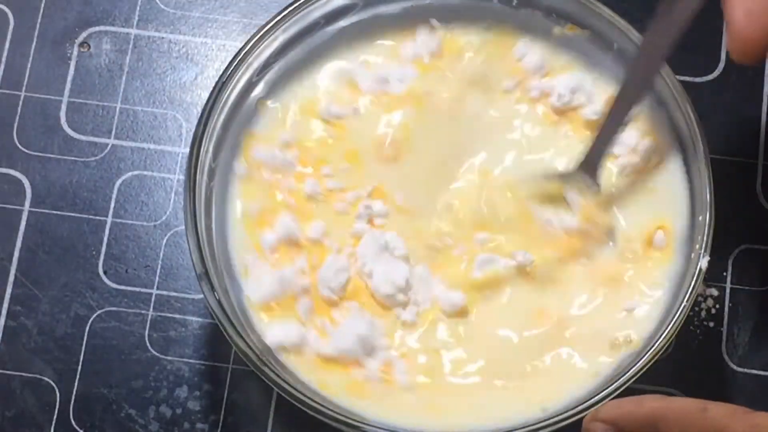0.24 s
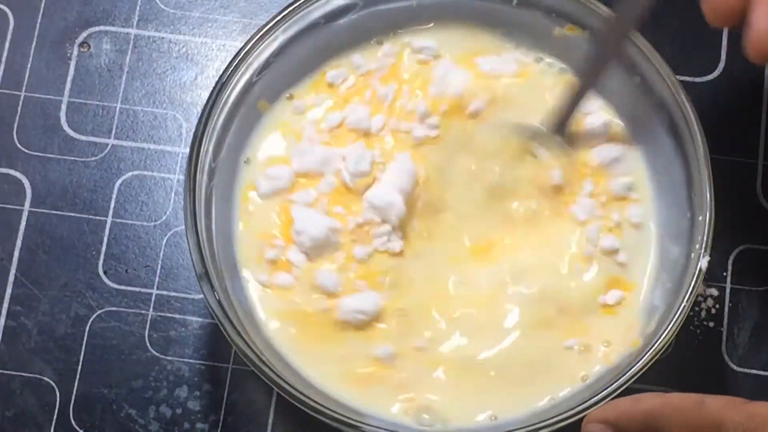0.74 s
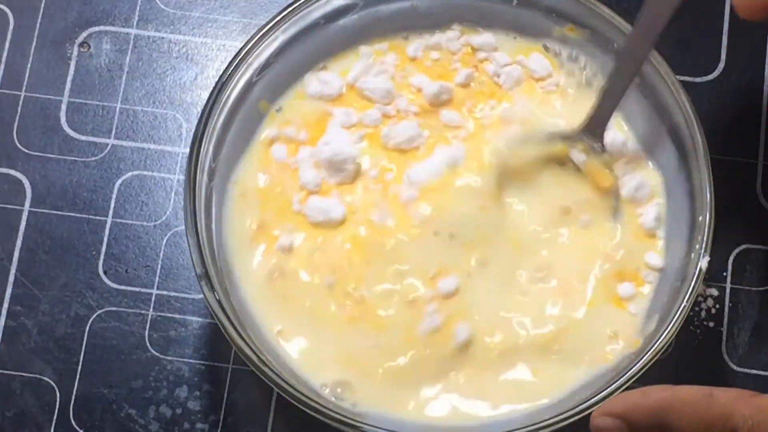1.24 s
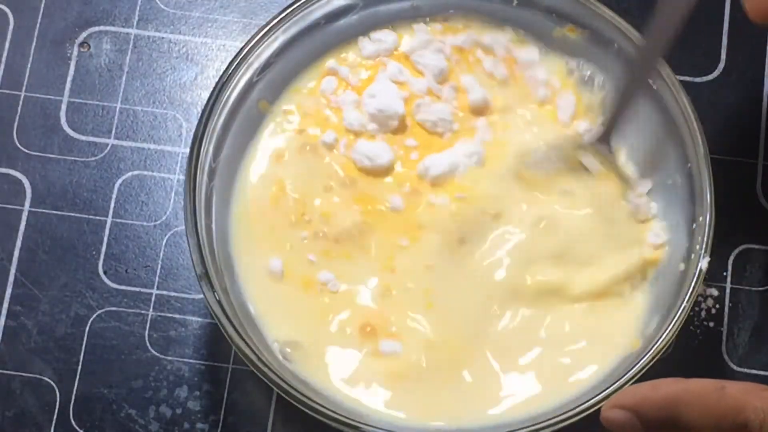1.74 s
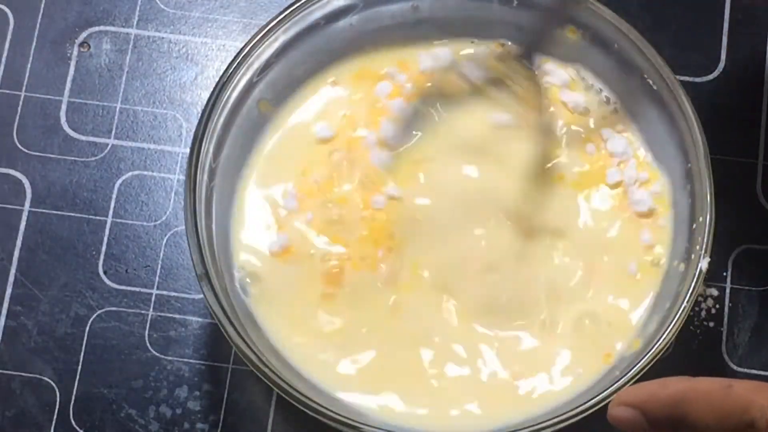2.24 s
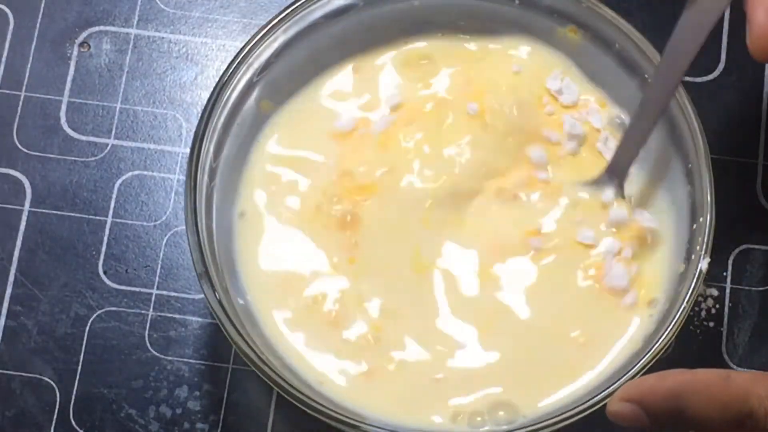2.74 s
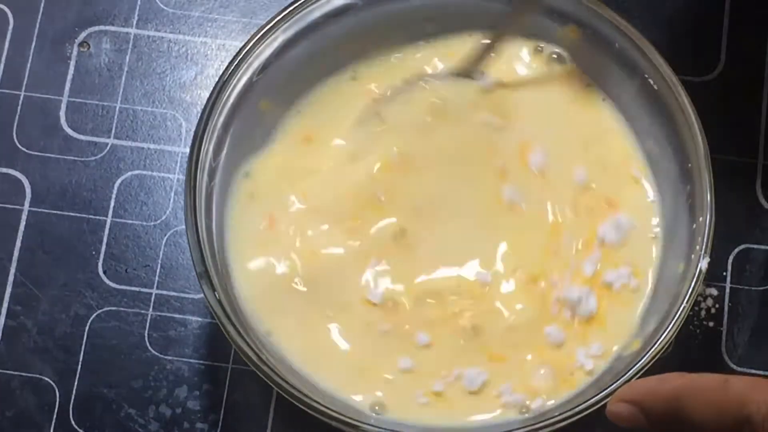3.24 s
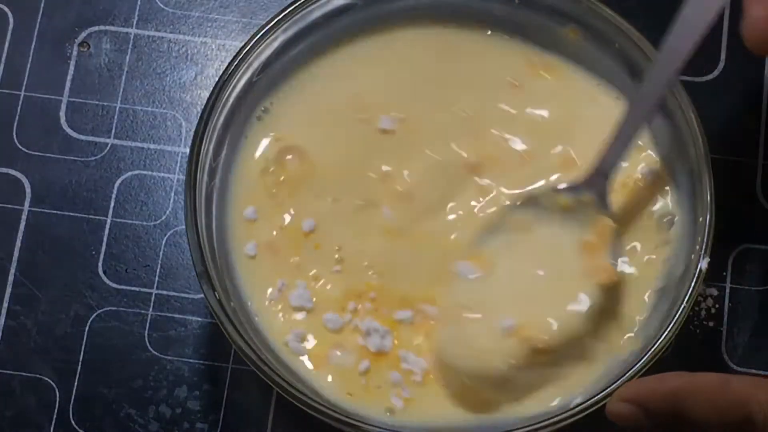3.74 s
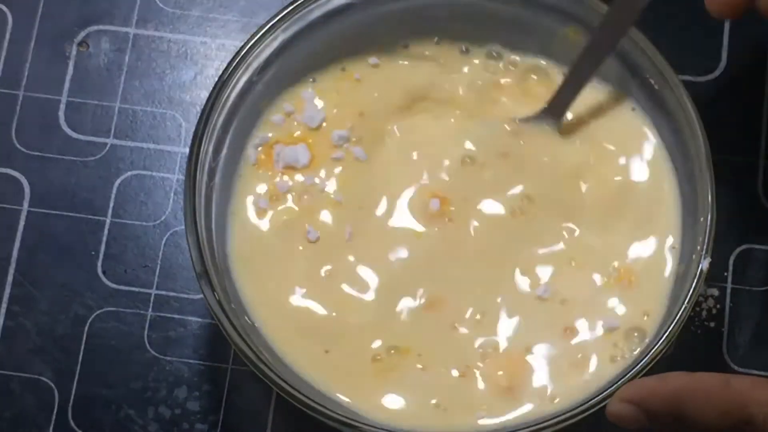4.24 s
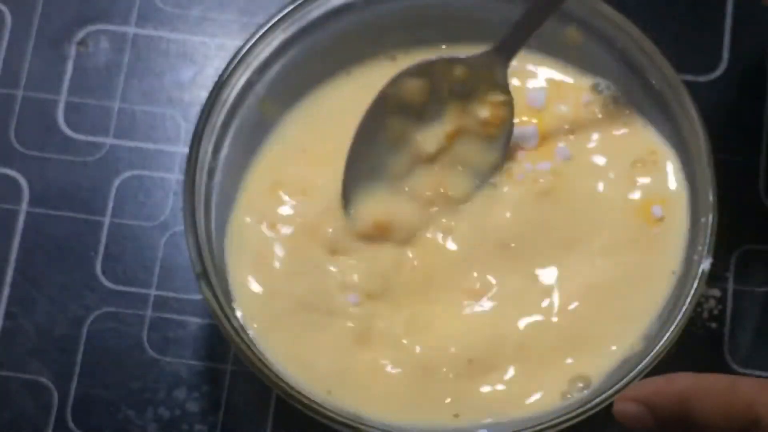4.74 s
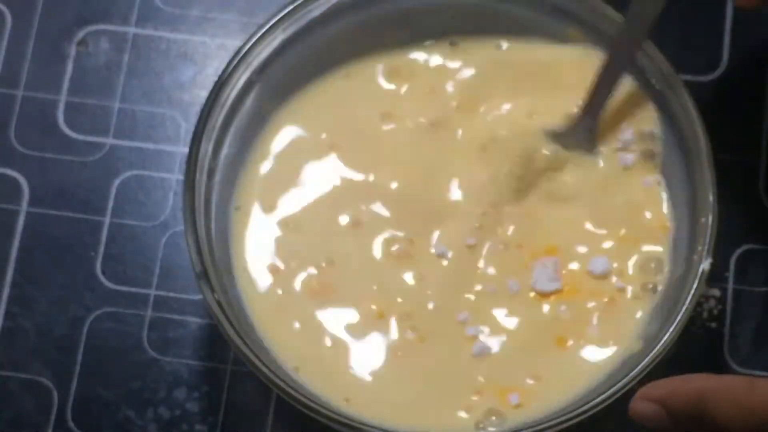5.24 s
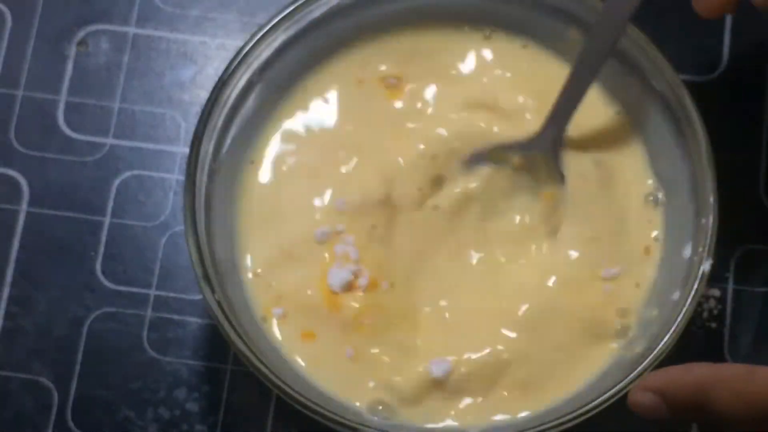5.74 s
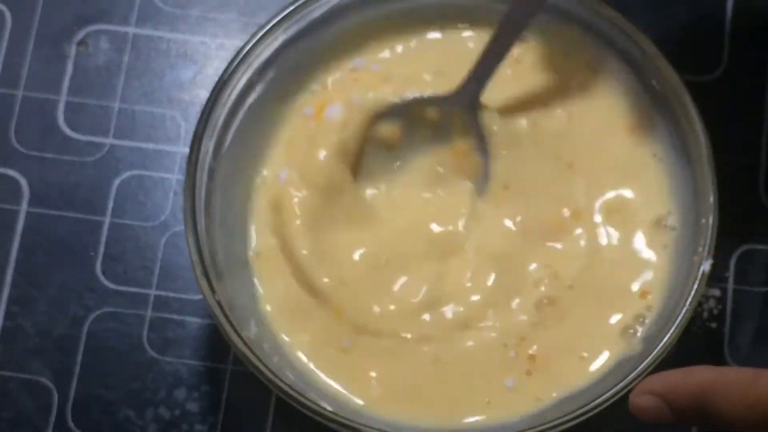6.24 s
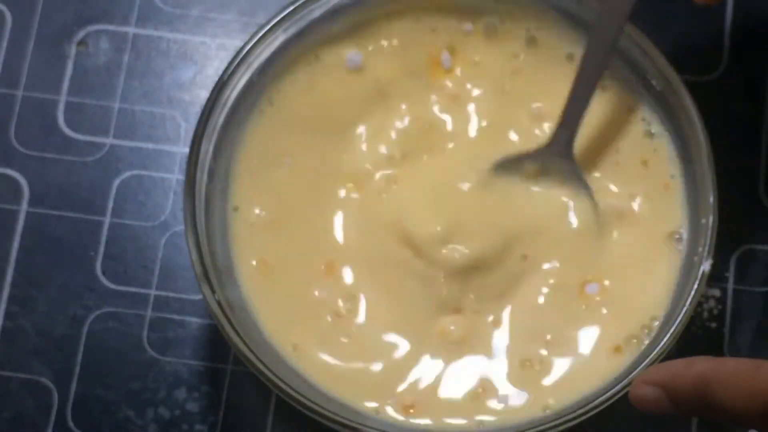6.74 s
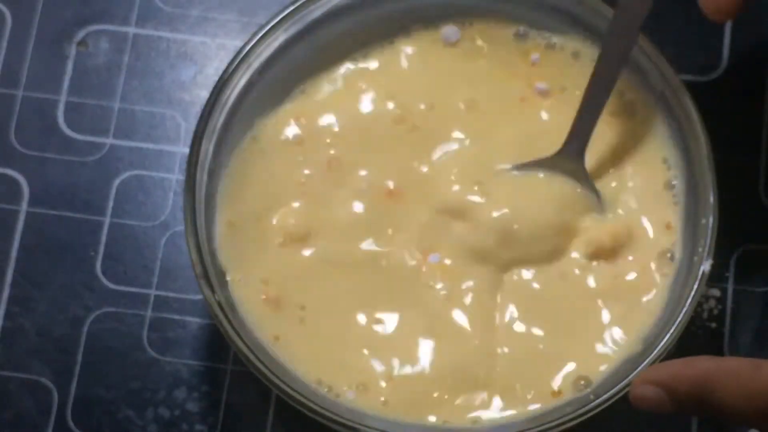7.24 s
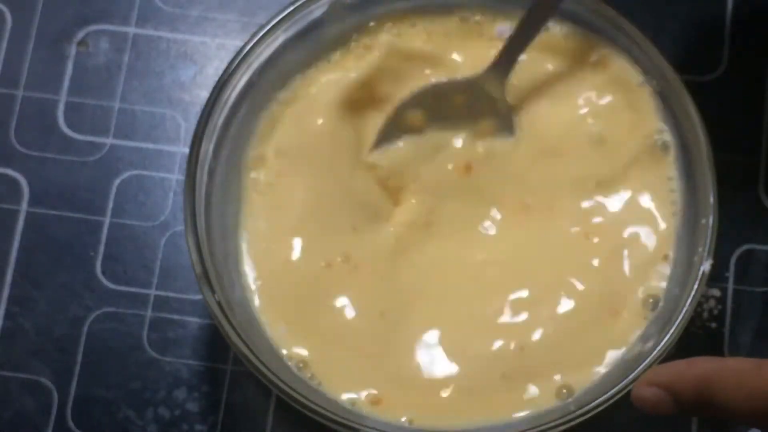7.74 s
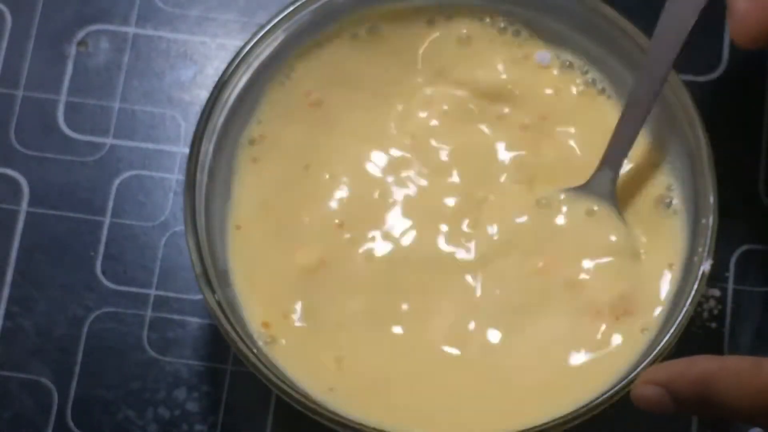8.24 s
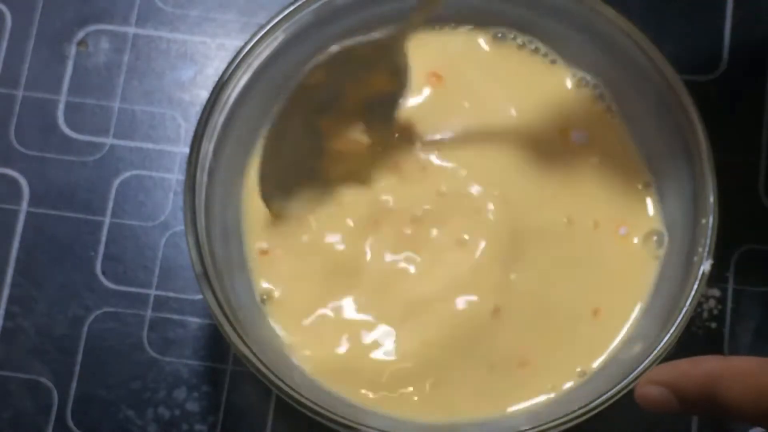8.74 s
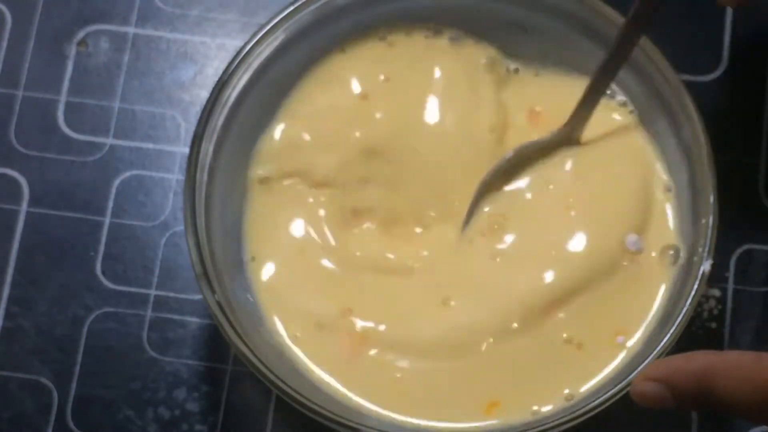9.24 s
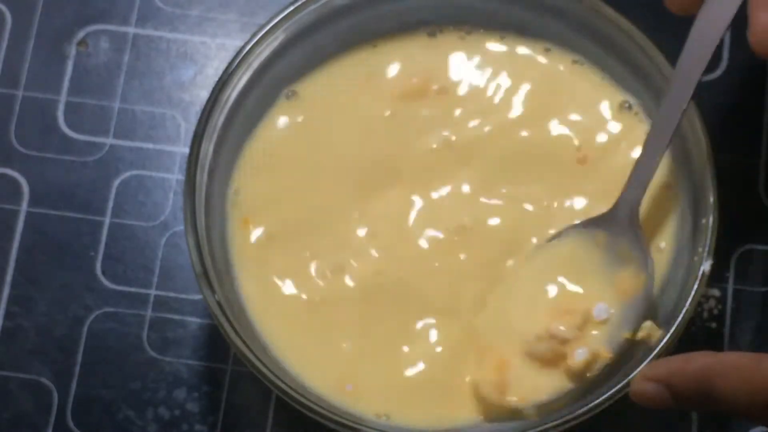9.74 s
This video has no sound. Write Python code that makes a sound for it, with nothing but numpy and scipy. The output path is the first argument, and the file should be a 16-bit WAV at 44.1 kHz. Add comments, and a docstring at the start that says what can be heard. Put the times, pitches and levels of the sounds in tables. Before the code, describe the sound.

A steel spoon stirs thick batter in a glass bowl, clinking dully against the wall with low rubbing and wet plops.

```python
"""A steel spoon stirs thick batter in a glass bowl on a kitchen counter, close to the microphone.
Its blows are damped modes of wall, bowl, counter and steel plus a burst of noise; between them
it scrapes in filtered random grains and drags with a low noise rumble and groaning tones.
The batter plops and bubbles in gliding sines, smacks in resonant crackle and swishes in soft noise.
A small hard room answers with decaying noise, over a faint hum and hiss."""
import sys
import numpy as np
from scipy import signal
from scipy.fft import rfft, irfft, next_fast_len
from scipy.io import wavfile
from scipy.ndimage import map_coordinates

SR = 44100
rng = np.random.default_rng(int(sys.argv[2]) if len(sys.argv) > 2 else 0)


def wav_record(signal):
    """Record a signal, one row per channel, as 16-bit PCM in the file named by sys.argv[1]."""
    frames = np.transpose(np.atleast_2d(signal))
    bounded = np.clip(frames, -1, 1)
    # unit amplitude maps onto the largest positive 16-bit level
    quanta = np.round(bounded * 32767).astype(np.int16)
    wavfile.write(sys.argv[1], SR, quanta)


N = 440118
T = np.arange(SR // 2) / SR  # seconds since a contact

# the bare rim, in close pairs that beat: pitch_hz [Hz], level_db [dB, relative], t60_s [s, when struck]
RIM_MODES = [(3402, 0, .36), (3414, -8, .3), (7480, -11, .33), (7495, -15, .3)]
# the steel spoon: pitch_hz [Hz], level_db [dB, relative], t60_s [s, when struck]
SPOON_MODES = [(5250, 5, 0.13), (5596, -13.5, 0.35), (6240, -5.5, 0.14), (9150, -6, 0.37)]


def amp(db):
    """Decibels to gain."""
    return 10 ** (np.asarray(db) / 20)


def unit(x):
    """Scale to rms 1."""
    return x / np.sqrt(np.mean(x ** 2) + 1e-20)


def burst(x):
    """Scale a short sound to the energy of 30 ms at rms 1."""
    return x / np.sqrt(np.sum(x ** 2) / (.03 * SR) + 1e-20)


def along(points, hz):
    """Read (Hz, value) points on a log frequency axis."""
    f, v = np.transpose(points)
    return np.interp(np.log(hz + 1), np.log(f + 1), v)


def curves(rows):
    """One value per sample for each column after the time."""
    s, *cols = np.transpose(rows)
    return [np.interp(np.arange(N) / SR, s, c) for c in cols]


def wobble(rate, size=N):
    """A smooth random curve, rate knots a second."""
    knots = rng.standard_normal(int(size * rate / SR) + 4)
    return map_coordinates(knots, [np.arange(size) * rate / SR])


def filtered(x, response):
    """x times a response of frequency."""
    m = next_fast_len(len(x) + 8192)  # zero padding leaves room for the filter's tail
    return irfft(rfft(x, m) * response(np.fft.rfftfreq(m, 1 / SR)), m)[:len(x)]


def coloured(x, spectrum):
    """x given a (Hz, dB) spectrum, at rms 1."""
    return unit(filtered(x, lambda hz: amp(along(spectrum, hz))))


def resonance(x, hz, q):
    """x through one causal resonance."""
    return filtered(x, lambda f: 1j * f * hz / q / (hz * hz - f * f + 1j * f * hz / q))


def narrow(hz, width):
    """Noise of rms 1 in a band that follows hz; width is the knots a second of its wander."""
    phase = 2 * np.pi * np.cumsum(hz) / SR
    in_phase = wobble(width, size=len(hz)) * np.cos(phase)
    quadrature = wobble(width, size=len(hz)) * np.sin(phase)
    return unit(in_phase + quadrature)


def grains(rate, spread_db):
    """Tiny random slips of uneven size, rate a second on average."""
    hits = rng.random(N) < rate / SR
    return hits * rng.standard_normal(N) * amp(spread_db * rng.standard_normal(N))


def during(x, s, size):
    """The stretch of x that starts at s seconds."""
    return np.roll(x, -round(s * SR))[:size]


def add(track, s, x):
    """Mix x into the track at s seconds."""
    start = max(round(s * SR), 0)
    track[start:start + len(x)] += x[:max(N - start, 0)]


def fade(t60, attack):
    """Envelope of a contact: quick rise, exponential decay."""
    return amp(-60 * T / t60) * (1 - np.exp(-T / attack))


def ping(hz, t60, attack):
    """One quickly damped resonance."""
    return burst(np.sin(2 * np.pi * hz * T) * fade(t60, attack))


def favoured(modes, hz, boost_db):
    """The point of contact changes the level of the modes near hz by up to boost_db."""
    return [(f, db + boost_db * np.exp(-(np.log(f / hz) / 0.18) ** 2), t60) for f, db, t60 in modes]


def struck(modes, attack, scatter_db, detune):
    """Modes ringing; where the spoon lands changes their strengths and, slightly, their pitch."""
    hz, db, t60 = np.transpose(modes)[:, :, None]
    size, shift, turn = rng.standard_normal((3, len(modes), 1))
    waves = np.sin(2 * np.pi * (hz * (1 + detune * shift) * T + turn))
    return burst(np.sum(amp(db + scatter_db * size) * fade(t60, attack) * waves, axis=0))


def chattering(x):
    """The spoon rebounds twice within a few milliseconds, each time more weakly."""
    y = x.copy()
    delays = np.cumsum(rng.uniform(.0006, 0.001834, size=2))
    for delay, gain in zip(delays, (.6, .35)):
        y += gain * np.pad(x, (int(delay * SR), 0))[:len(x)]
    return burst(y)


def stroke(s, length, hz, rise):
    """Envelope and pitch of one stroke: it swells to a crest, dies away, and sinks as the spoon slows."""
    swell_power, sag_octaves_per_s = 1.12, 0.808  # a higher power makes a more pointed swell
    t = np.arange(int(length * SR)) / SR
    crest = length * rise  # rise: share of the stroke spent swelling
    arc = np.sin(np.pi / 2 * np.interp(t, [0, crest, length], [0, 1, 2]))
    return np.abs(arc) ** swell_power, hz * 2 ** (-sag_octaves_per_s * (t - crest))


def in_room(x, wet_db, build=0.0014):
    """x with the answer of the kitchen: a noise tail whose treble dies first."""
    # decay of the room: band_hz [Hz], t60_s [s]
    room_decay = [(150, 0.36), (800, 0.3), (2500, 0.34), (6000, 0.18), (14000, 0.18)]
    # tone of its answer: band_hz [Hz], level_db [dB, relative]
    room_tone = [(100, 13), (1000, 2.5), (2500, -3.5), (6000, 2.5), (15000, 0.5)]
    hz, t, z = signal.stft(rng.standard_normal(len(T)), SR, nperseg=256)
    z = z * amp(along(room_tone, hz)[:, None] - 60 * t / along(room_decay, hz)[:, None])
    tail = signal.istft(z, SR, nperseg=256)[1][:len(T)]
    tail = tail * (1 - np.exp(-(T / build) ** 2))  # the answer builds up just after the direct sound
    tail = tail / np.linalg.norm(tail)
    return x + amp(wet_db) * signal.fftconvolve(x, tail)[:len(x)]


def clinks():
    """Each blow: a dead clack of the wall, a chink and crack of steel on glass, ringing, a counter knock."""
    # spoon meets bowl: start_s [s], strength_db [dB], wall_hz [Hz], spoon_hz [Hz],
    # hardness_db, thud_db, ring_db [dB relative to strength]; batter that cushions lowers the hardness
    blows = [(0.7775, -44, 1256, 2800, -39, -8.5, -43), (0.9477, -46, 1190, 2770, -30, -1, -47),
             (1.1014, -47.5, 1430, 3900, -33, 3, -38), (1.2845, -33.5, 1960, 3580, -13, -4.5, -34),
             (1.4547, -39, 2070, 3270, -19.5, 2, -30), (1.6396, -51, 1960, 3600, -27, 7, -28),
             (1.805, -34.5, 1490, 3700, -11.5, 2, -28), (1.9792, -34.5, 1990, 4010, -4, 2.5, -17.5),
             (2.177, -36.5, 2030, 3800, -4, -2, -16), (2.633, -46.5, 1244, 4200, 0.5, 10, -16),
             (3.42, -46, 2310, 3270, -30.5, -36, -34), (3.507, -40.5, 2220, 3080, -10, -2.5, -39),
             (4.2151, -38.5, 2010, 4370, -4.5, -1.5, -24), (5.0486, -32.5, 1410, 5140, -17, -7.5, -19.5),
             (5.1839, -52, 2070, 5760, 1.5, 5, -6), (5.589, -32.5, 1970, 4700, -6, 2.5, -10.5),
             (5.7723, -34.5, 1980, 3940, 2.5, 2, -8.5), (5.9567, -37, 2100, 3220, -8, 1, -13),
             (7.0211, -40.5, 840, 3020, -3, 6, -20.5), (7.1947, -40.5, 936, 3890, -1, 4.5, -30),
             (7.3756, -52, 956, 3880, -24.5, 3.5, -26), (7.5526, -50, 934, 2840, -21, -2.5, -32.5),
             (7.748, -39, 1295, 2680, -13, -11.5, -39), (7.9493, -45.5, 1456, 3650, -16.5, -5, -32),
             (8.196, -51.5, 2350, 2840, -35.5, -2, -33), (8.9586, -40, 907, 2740, -3.5, -4, -23),
             (9.1519, -53.5, 1740, 1750, -20, -14.5, -47)]
    # the wall, damped by batter: pitch_hz [Hz], level_db [dB, relative], t60_s [s]
    wall_modes = [(1070, 0, 0.013), (1438, 0, 0.021), (1540, -17, 0.018), (1950, -3, 0.012),
                  (2276, 1, 0.041), (2820, -9.5, 0.025)]
    # the filled bowl as a whole: pitch_hz [Hz], level_db [dB, relative], t60_s [s]
    bowl_modes = [(334.3, -7, .1), (396.5, -14, 0.057), (473.3, -10, 0.059), (521, -10, 0.12),
                  (617, -5, 0.091), (673, -4.5, 0.11), (739, -0.5, 0.036), (855, -6.5, 0.18),
                  (939.3, -5.5, .13)]
    # the counter under it: pitch_hz [Hz], level_db [dB, relative], t60_s [s]
    counter_modes = [(115.7, -2, 0.36), (144.2, -6.5, 0.57), (146, -12, 0.2), (197.9, -1.5, 0.32),
                     (235.8, -3, 0.2), (283, -5.5, .16)]
    # the wall's lasting tones: pitch_hz [Hz], level_db [dB, relative], t60_s [s]
    wall_tones = [(1300, -3, .16), (1373, -3, .16), (1522, -5, .16), (1705, -6, .15), (1937, 0, .2),
                  (2120, -6, .14)]
    # noise of steel on glass: band_hz [Hz], level_db [dB per Hz, relative]
    crack_tone = [(1500, -28.5), (3500, 1.5), (5400, -2), (7000, -2.5), (8200, -6.5), (9800, -3),
                  (12000, -7.5), (16000, -14.5)]
    chink_by_hardness = 0.8  # dB per dB
    # a higher-pitched contact rings the spoon more and the rim less; the even pitch favours neither
    tilt_db_per_octave, even_hz = 15.5, 4060
    favoured_bowl_hz = 638
    out = np.zeros(N)
    for s, clack_db, wall_hz, spoon_hz, hard_db, thud_db, ring_db in blows:
        # bare contact brings out the bright parts; a push into the bowl brings out the low ones
        crack_db, body_db = clack_db + hard_db, clack_db + thud_db
        chink_db = clack_db + chink_by_hardness * hard_db
        tilt_db = tilt_db_per_octave * np.log2(spoon_hz / even_hz)
        steel_db, rim_db = clack_db + ring_db + tilt_db, clack_db + ring_db - tilt_db

        wall_set = favoured(wall_modes, wall_hz, boost_db=-2)
        wall = chattering(struck(wall_set, attack=0.00012, scatter_db=3, detune=0.055))
        wall = burst(wall + amp(1.5) * ping(wall_hz, t60=0.013, attack=0.00099))
        push = amp(body_db - 9.5) * ping(448, t60=0.0034, attack=0.00068)
        # a film of batter cushions the blow: the less crack, the duller the clack
        edge_hz = np.clip(4500 * amp(0.3 * (hard_db + 13.5)), 1700, 9000)
        dulling = signal.butter(6, edge_hz, fs=SR, output="sos")
        clack = signal.sosfilt(dulling, amp(clack_db) * wall + push)

        grit = coloured(rng.standard_normal(len(T)), crack_tone)
        chink = amp(chink_db) * chattering(ping(spoon_hz, t60=0.0051, attack=0.00027))
        crack = amp(crack_db + 0.7) * burst(grit * fade(t60=0.013, attack=0.0011))

        bowl_set = favoured(bowl_modes, favoured_bowl_hz, boost_db=3)
        body = amp(body_db - 4) * struck(bowl_set, attack=0.0015, scatter_db=3.5, detune=0.016)
        knock = amp(body_db - 1) * struck(counter_modes, attack=0.0079, scatter_db=1.5, detune=0.021)

        ring = amp(clack_db - 9) * struck(wall_tones, attack=.002, scatter_db=2, detune=.005)
        spoon_set = favoured(SPOON_MODES, spoon_hz, boost_db=9)
        ring += amp(steel_db - 9.5) * struck(spoon_set, attack=.001, scatter_db=2.5, detune=0.003)
        rim = amp(rim_db) * struck(RIM_MODES, attack=.001, scatter_db=1.5, detune=.0005)

        bright = in_room(clack + chink + crack, wet_db=-8)
        full = in_room(body + ring, wet_db=-12)
        add(out, s, bright + full + rim + knock)
        # the spoon grazes through the batter film just before it lands
        graze = amp(crack_db - 21.5) * burst(grit * fade(t60=0.016, attack=.002))
        add(out, s - .003, graze)
    return out


def scrapes():
    """The spoon's edge slips along the glass in fine grains; its chatter sinks in pitch along each stroke."""
    # scrapes along the wall: start_s [s], length_s [s], level_db [dB], centre_hz [Hz at the crest],
    # grit_db [dB]
    wall_scrapes = [(2.609, 0.096, -54, 1300, -56), (2.698, 0.076, -65, 1680, -63),
                    (3.383, 0.053, -55.5, 1870, -81), (3.489, 0.026, -46.5, 1452, -89),
                    (3.614, 0.04, -64, 2220, -62), (3.691, 0.12, -51.5, 1261, -57),
                    (9.461, .24, -48, 1830, -84), (9.608, 0.079, -49, 1500, -58),
                    (9.68, 0.082, -56.5, 1320, -66)]
    # coarse rasp: band_hz [Hz], level_db [dB per Hz, relative]
    rasp_tone = [(350, -51), (600, -11), (821, -6.5), (919, -10), (1200, 3.5), (1830, -28), (1970, 7),
                 (2270, -26), (3340, -8.5), (3600, -63), (5380, -70), (5870, -64), (12000, -49),
                 (15600, -74), (22000, -120)]
    # fine grit: band_hz [Hz], level_db [dB per Hz, relative]
    grit_tone = [(2500, -26), (3800, 19), (4600, 3), (5300, -15), (6200, 8), (7500, -12), (9000, -14),
                 (15000, -11)]
    out = np.zeros(N)
    slips = grains(rate=580, spread_db=5.5)
    rasp, grit = coloured(slips, rasp_tone), coloured(slips, grit_tone)
    # the slips also make rim and spoon sing
    singing = unit(sum(amp(level) * resonance(slips, hz, q=150) for hz, level, _ in RIM_MODES + SPOON_MODES))
    for s, length, db, centre_hz, grit_db in wall_scrapes:
        swell, hz = stroke(s, length, centre_hz, rise=.45)
        chatter = unit(narrow(hz, width=330) + amp(-6.5) * narrow(1.8 * hz, width=1300))
        pressure = swell * amp(3.9 * wobble(61.3, size=len(hz)))
        coarse = during(rasp, s, size=len(hz)) + amp(0.5) * chatter
        fine = during(grit + amp(-3.5) * singing, s, size=len(hz))
        add(out, s, pressure * (amp(db - 5) * coarse + amp(grit_db - 4.5) * fine))
    return in_room(out, wet_db=-4.5)


def drag():
    """The spoon rubs over the bottom and makes the counter rumble; now and then it sticks, slips and groans."""
    # rubbing, almost silent where the spoon is lifted: time_s [s], rumble_db [dB]
    rubbing = [(0, -58), (.25, -57), (.38, -61.5), (1.4, -53.5), (2.25, -57.5), (2.45, -76), (2.8, -55),
               (3.3, -56.5), (3.95, -67.5), (4.45, -56.5), (5.3, -57.5), (5.45, -61), (6.1, -54),
               (6.9, -61), (7.4, -52.5), (8, -55), (8.45, -69), (9.2, -63), (9.5, -57.5), (9.98, -64)]
    # rumble: band_hz [Hz], level_db [dB per Hz, relative]
    rumble_tone = [(20, -39), (35, -19), (52, -1.5), (72, 0.5), (92, -2), (115, -2), (135, -3.5), (170, 1),
                   (200, -3.5), (230, -17.5), (300, -27.5), (450, -35), (900, -69)]
    # low groans of stick and slip: start_s [s], length_s [s], level_db [dB], pitch_hz [Hz, on average]
    groans = [(0.101, 0.24, -55, 70.8), (.1, 0.19, -55, 171), (.42, .16, -57, 190),
              (.66, 0.42, -50.5, 165.4), (2.75, 0.13, -55, 150), (2.931, 0.16, -51, 113.2),
              (3.104, .12, -57, 74), (3.75, 0.26, -59, 181), (4.35, .14, -51, 113),
              (4.56, 0.16, -48.5, 111.6), (4.69, 0.13, -51, 168.6), (4.929, 0.27, -54, 69),
              (5.269, 0.079, -51, 141), (6.156, 0.097, -51.5, 112.4), (6.401, 0.38, -60, 69.9),
              (6.73, 0.36, -60, 173.7), (7.8, 0.24, -52.5, 109.7), (8.155, 0.18, -55, 70),
              (9.361, .18, -48, 112.8), (9.704, 0.18, -59, 228), (9.776, .2, -59.5, 70.5)]
    out = amp(curves(rubbing)[0]) * coloured(rng.standard_normal(N), rumble_tone)
    for s, length, db, hz in groans:
        swell = stroke(s, length, hz, rise=0.37)[0]
        pitch = hz * (1 + 0.029 * wobble(30.7, size=len(swell)))
        slip = 2 * np.pi * np.cumsum(pitch) / SR
        judder = np.sin(slip) + amp(-24) * np.sin(2 * slip)
        judder = judder * amp(3.3 * wobble(23.4, size=len(swell)))
        add(out, s, amp(db + 2.5) * swell * judder)
    return out


def batter():
    """Air pockets plop, bubbles burst, the wake smacks shut, and the thick liquid swishes."""
    # pockets of batter closing: start_s [s], level_db [dB], pitch_hz [Hz, settled], t60_s [s]
    pockets = [(2.644, -34.5, 440, 0.05), (3.182, -28, 264, 0.018), (3.262, -40.5, 319, 0.014),
               (3.633, -44.5, 335, 0.071), (4.305, -40, 1006, 0.037), (5.213, -44, 470, 0.085),
               (5.224, -38, 290, 0.052), (5.239, -40.5, 153, 0.16), (8.975, -38.5, 252, 0.077),
               (9.869, -50.5, 336, 0.076)]
    # small bubbles bursting: start_s [s], level_db [dB], pitch_hz [Hz, at the start]
    bubbles = [(.274, -40, 14500), (2.987, -41.5, 3400), (4.028, -52, 4960), (4.724, -51, 2060),
               (5.01, -39, 1900), (7.636, -42.5, 2480), (7.725, -27, 5800), (7.728, -32, 9100),
               (7.91, -36, 4730), (7.926, -29, 6100), (8.077, -29, 13400)]
    # wet smacks around the spoon: start_s [s], level_db [dB], pitch_hz [Hz], fizz_db [dB]
    wet_smacks = [(2.699, -44.5, 1243, -50), (2.739, -45, 1780, -53), (4.417, -42.5, 1050, -72),
                  (6.438, -47.5, 2600, -34.5), (9.323, -48, 1480, -60), (9.865, -38.5, 1720, -73)]
    # batter swishing past the spoon: start_s [s], length_s [s], level_db [dB],
    # centre_hz [Hz at the crest]
    swishes = [(0.0, 0.07, -59, 2350), (0.039, 0.34, -67, 1143), (2.3, 0.39, -67, 1226),
               (2.849, 0.078, -57, 1047), (4.356, 0.13, -58.5, 1040), (4.501, 0.39, -72.5, 1250),
               (6.476, 0.44, -65, 1195), (8.226, 0.19, -59, 1070), (8.552, 0.38, -63.5, 1234),
               (8.78, 0.19, -58, 936), (9.069, 0.14, -56, 1570), (9.262, 0.13, -57.5, 1427)]
    # flowing batter: band_hz [Hz], level_db [dB per Hz, relative]
    flow_tone = [(200, -6), (450, 4.5), (800, 3.5), (1200, 2.5), (2000, -3), (3200, -8.5), (6000, -27),
                 (12000, -31)]
    out = np.zeros(N)
    for s, db, hz, t60 in pockets:
        pitch = hz + 800 * np.exp(-T / 0.0013)  # the pocket widens and its note drops
        note = np.sin(2 * np.pi * np.cumsum(pitch) / SR) * fade(t60, attack=0.0017)
        add(out, s, amp(db + 6) * note + amp(db - 28.5) * ping(870, t60=0.036, attack=0.00059))
    for s, db, hz in bubbles:
        pitch = hz * (1 + 0.42 * (1 - np.exp(-T / 0.012)))  # a bubble's note rises as it surfaces
        note = np.sin(2 * np.pi * np.cumsum(pitch) / SR) * fade(t60=0.007 + 50 / hz, attack=0.0001)
        add(out, s, amp(db - 6.5) * note)
    for s, db, hz, fizz_db in wet_smacks:
        crackle = rng.standard_normal(len(T)) * amp(1.8 * rng.standard_normal(len(T)))
        smack = burst(resonance(crackle * fade(t60=0.21, attack=0.0006), hz, q=4.9))
        fizz = burst(crackle * fade(t60=0.18, attack=0.0005))
        add(out, s, amp(db - 11.5) * smack + amp(fizz_db - 15) * fizz)
    flow = coloured(grains(rate=2500, spread_db=-2), flow_tone)
    for s, length, db, centre_hz in swishes:
        swell, hz = stroke(s, length, centre_hz, rise=.35)
        swish = during(flow, s, size=len(hz)) + amp(2.5) * narrow(hz, width=400)
        add(out, s, swell * amp(db - 9 + 3.4 * wobble(20.8, size=len(hz))) * swish)
    return in_room(out, wet_db=-12)


def background():
    """Faint steady hiss of shaped noise and two wavering lines of low hum."""
    # hiss: band_hz [Hz], level_db [dB per Hz, relative]
    hiss_tone = [(20, -31), (35, -13.5), (55, -2.5), (72, -3.5), (120, -13.5), (195, -2.5), (290, -15),
                 (600, -18.5), (800, -23), (2000, -21), (2600, -25), (9300, -33), (10500, -36),
                 (13200, -29), (15000, -34), (16000, -47.5)]
    hiss_db, hum_db = -70, -71  # rms; the hiss is levelled by its part above 300 Hz
    noise = coloured(rng.standard_normal(N), hiss_tone)
    hiss = noise / np.std(filtered(noise, lambda hz: hz > 300))
    low_hum = narrow(np.full(N, 71.), width=10)
    high_hum = narrow(np.full(N, 197.), width=9.1)
    return amp(hiss_db) * hiss + amp(hum_db) * (low_hum + high_hum)


def scene():
    """All sources at one microphone."""
    return (clinks() + scrapes() + drag() + batter() + background())[None]


def record(dry):
    """The small microphone loses the deepest bass; a steep band limit takes away the extreme treble."""
    bass_hz, top_hz = 42, 16000
    thin = signal.sosfilt(signal.butter(4, bass_hz, "highpass", fs=SR, output="sos"), dry)
    return np.array([filtered(x, lambda hz: 1 / np.sqrt(1 + (hz / top_hz) ** 200)) for x in thin])


dry = scene()
out = record(dry)
wav_record(out)
```